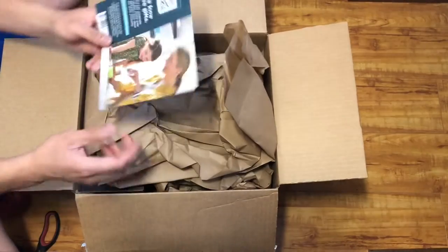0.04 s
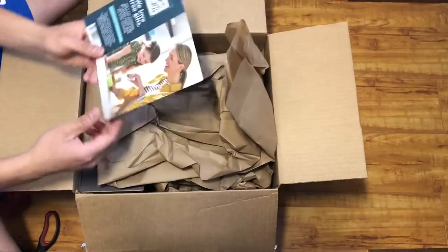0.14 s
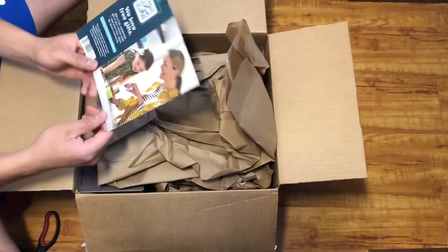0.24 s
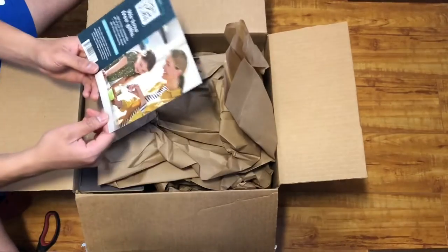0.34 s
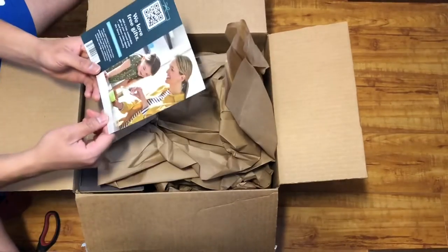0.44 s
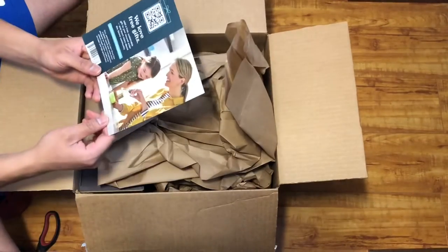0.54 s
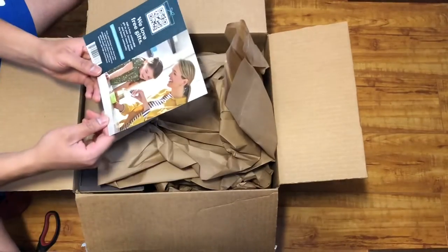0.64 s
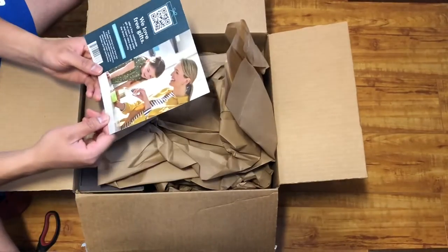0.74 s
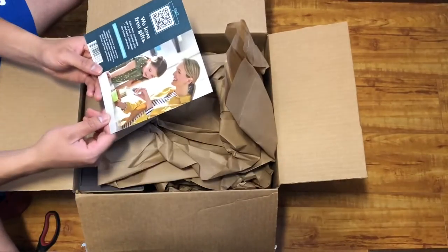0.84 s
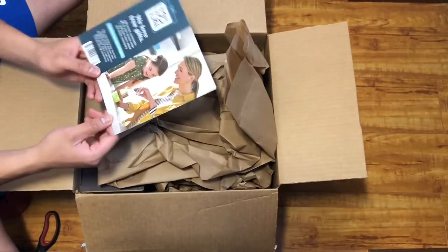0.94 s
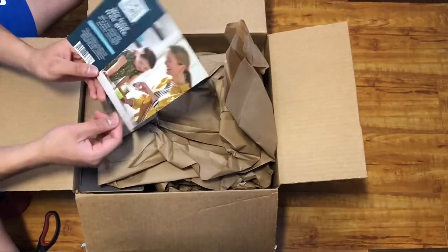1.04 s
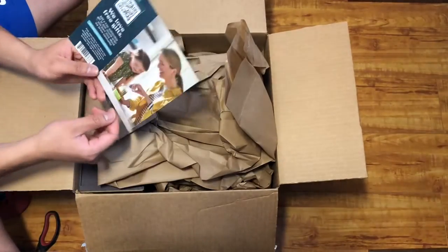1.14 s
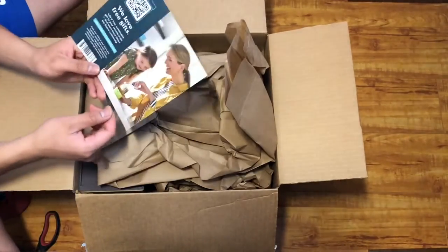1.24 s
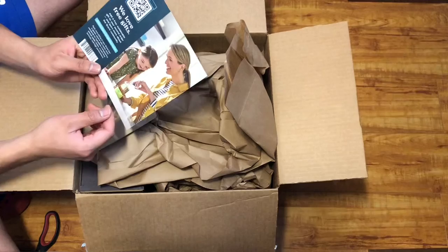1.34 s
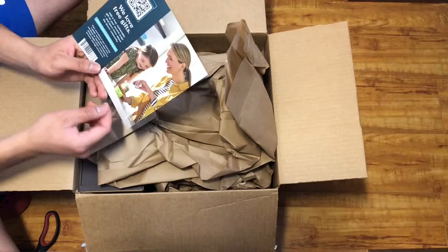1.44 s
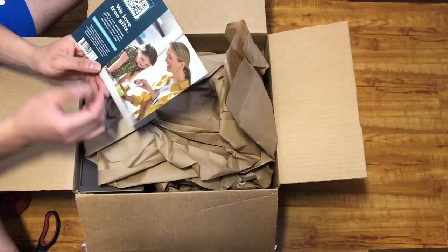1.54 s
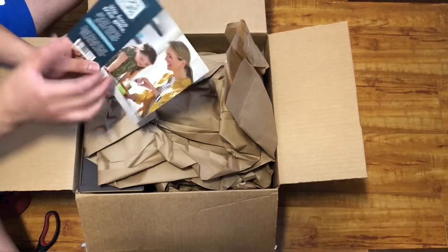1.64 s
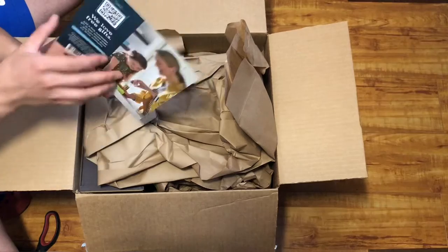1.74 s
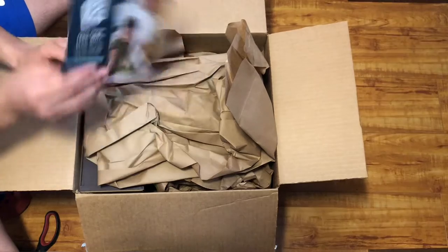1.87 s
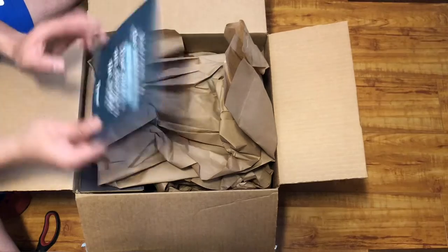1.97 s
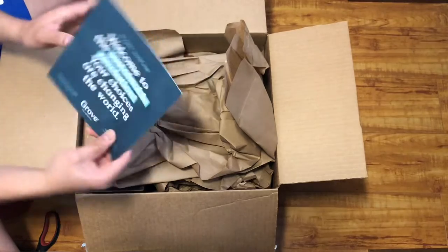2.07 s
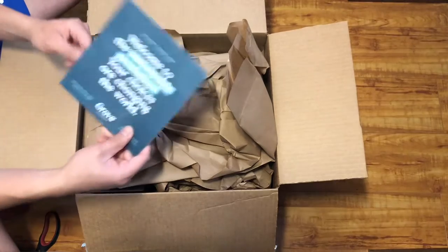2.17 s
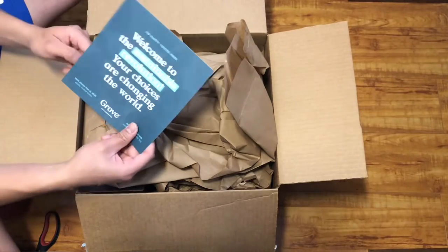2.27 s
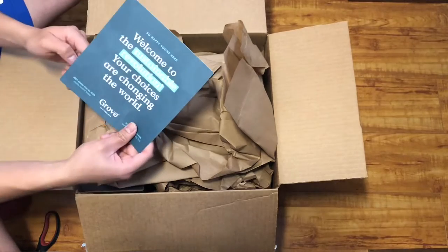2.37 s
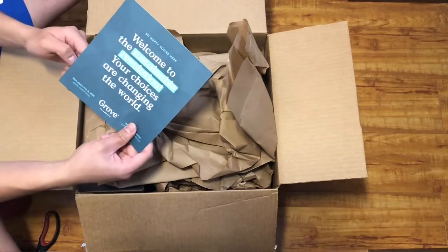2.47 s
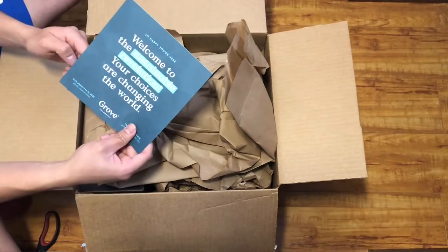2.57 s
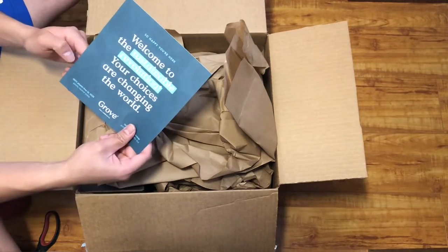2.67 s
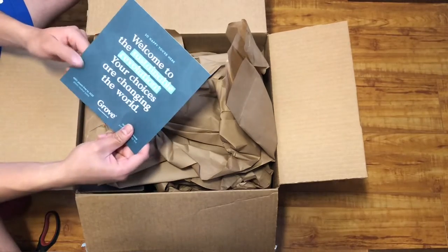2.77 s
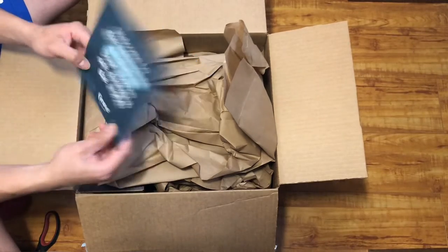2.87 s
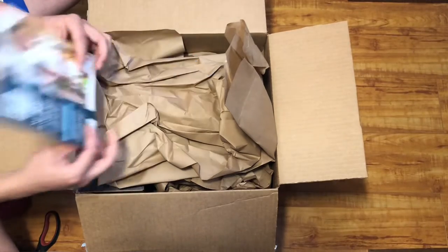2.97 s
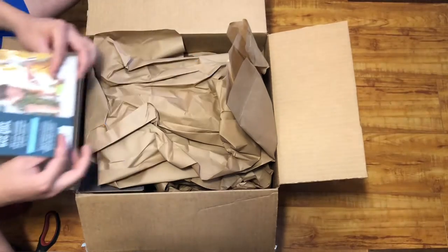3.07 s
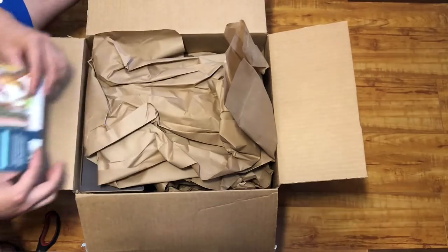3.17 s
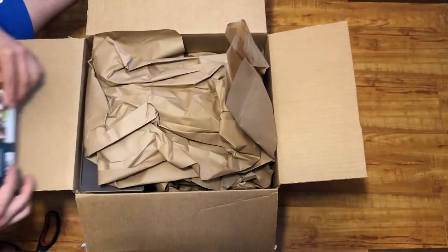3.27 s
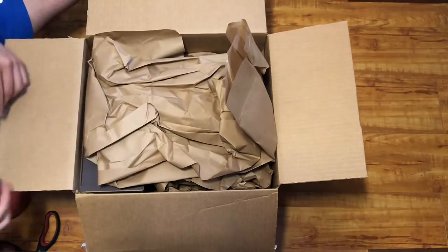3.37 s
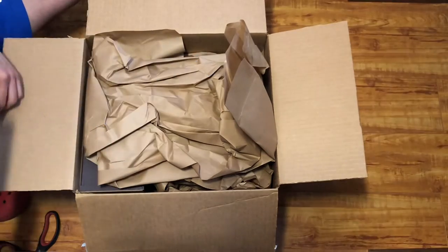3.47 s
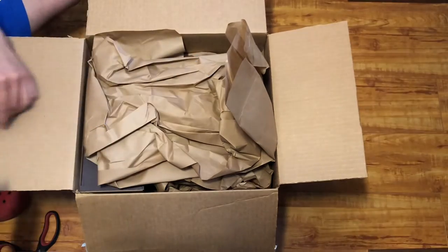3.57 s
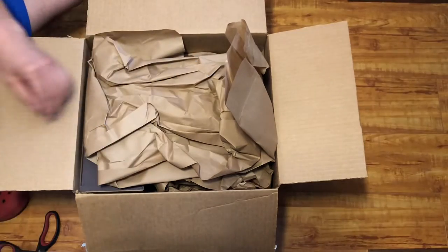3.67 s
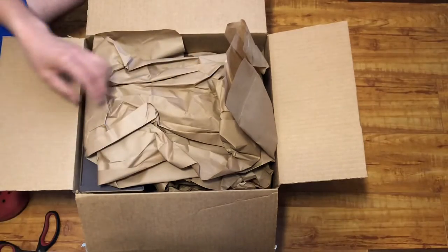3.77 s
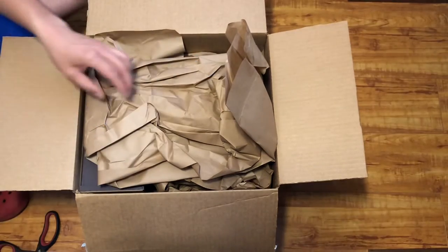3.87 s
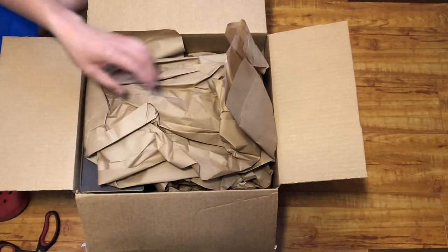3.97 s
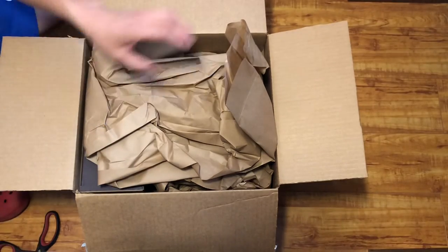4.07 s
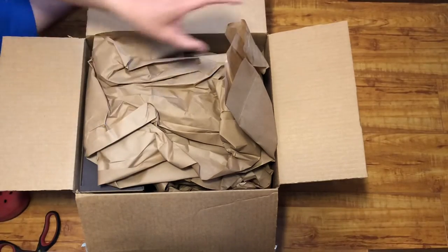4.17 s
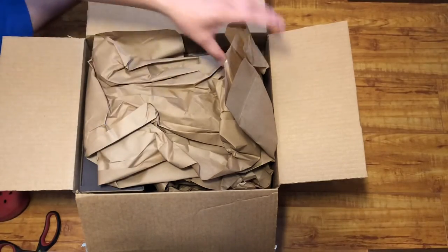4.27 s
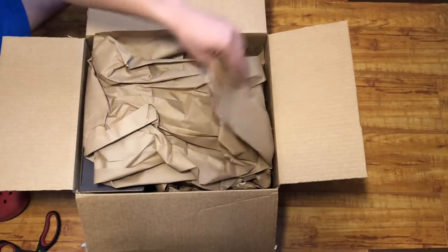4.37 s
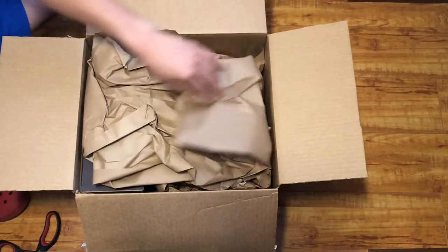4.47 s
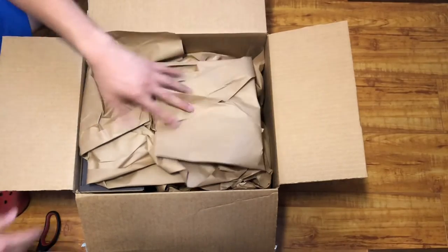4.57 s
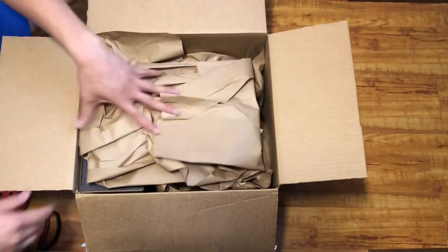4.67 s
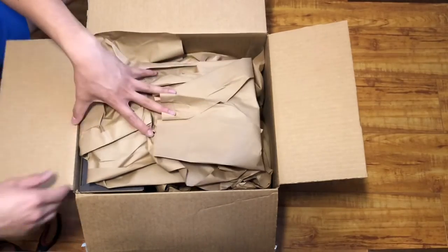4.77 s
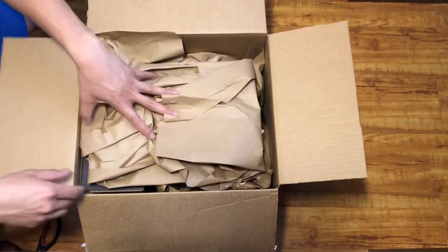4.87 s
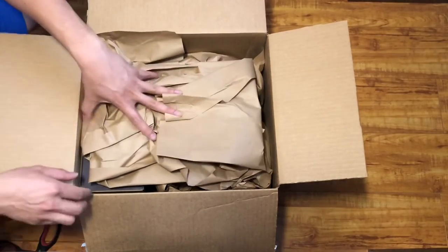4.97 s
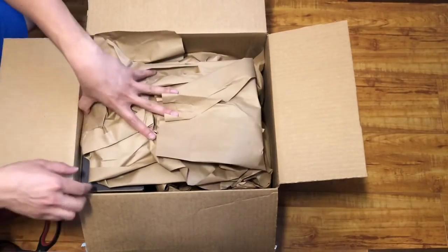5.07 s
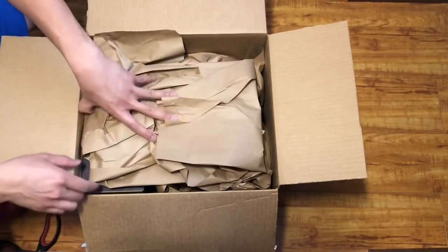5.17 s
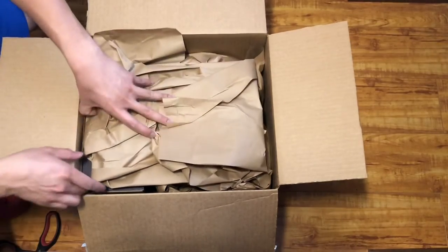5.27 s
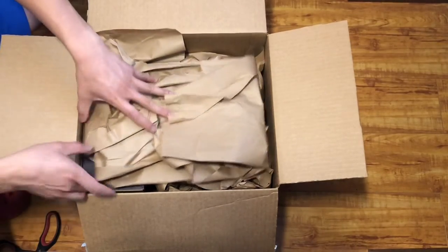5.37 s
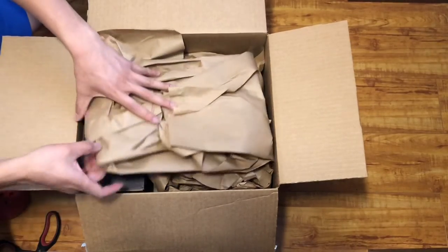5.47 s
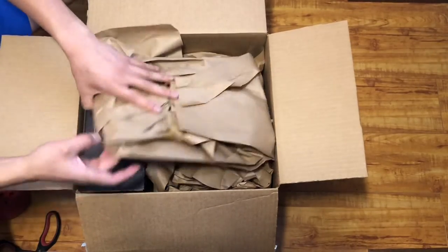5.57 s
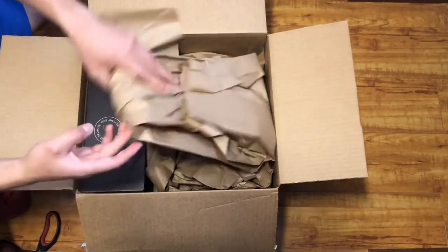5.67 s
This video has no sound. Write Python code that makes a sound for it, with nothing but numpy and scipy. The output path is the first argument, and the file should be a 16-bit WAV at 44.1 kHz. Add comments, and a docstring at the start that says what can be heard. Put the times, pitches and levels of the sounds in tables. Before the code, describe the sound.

In a quiet small room, close up, fingers brush a glossy card, pause, then flip it with light snaps. It drops on a cardboard flap with a dull knock. After a near-silent gap, stiff brown paper is grabbed and pressed in a box, crackling loudly to the end.

```python
"""A quiet room, a box close by: fingers slide over and flick a glossy card and drop it on a cardboard flap,
then press and pull kraft paper in the box. Clumps of tiny noise bursts make the slides and crackles;
bright noise bursts through a resonance are the buckling creases; sheet and box modes ring dully below.
The room adds a short diffuse tail and a hiss of shaped noise; two far sine tones hum for a moment."""
import sys
import numpy as np
from scipy import signal
from scipy.fft import rfft, irfft, next_fast_len
from scipy.io import wavfile

SR = 44100
rng = np.random.default_rng(int(sys.argv[2]) if len(sys.argv) > 2 else 0)


def store_pcm(level_fs):
    """Save levels as 16-bit WAV."""
    pcm = np.round(np.clip(level_fs, -1, 1) * 32767).astype(np.int16)
    wavfile.write(sys.argv[1], SR, np.atleast_2d(pcm).T)


N = 252252
PAPER_FROM_S = 4.0   # glossy card before this time, kraft paper after it


def amp(db):
    """Amplitude factor of a level in dB."""
    return 10 ** (np.asarray(db) / 20)


def rms_one(x):
    """Scales a signal to an rms of 1."""
    return x / np.sqrt(np.mean(x ** 2) + 1e-20)


def in_time(rows):
    """Draws each column as a line through its times, sample by sample."""
    s, *columns = np.transpose(rows)
    return [np.interp(np.arange(N) / SR, s, column) for column in columns]


def coloured(x, points):
    """Weighs the spectrum by (frequency [Hz], level [dB]) points, joined over log frequency."""
    hz, level_db = np.transpose(points)
    size = next_fast_len(N)
    grid = np.maximum(np.arange(size // 2 + 1) * SR / size, 1)
    weight_db = np.interp(np.log(grid), np.log(hz), level_db)
    return irfft(rfft(x, size) * amp(weight_db), size)[:N]


def drift(rate_hz):
    """Slow chance of spread 1: noise through two equal low-pass poles, after a second to settle."""
    r = np.exp(-2 * np.pi * rate_hz / SR)
    slow = signal.lfilter([1], [1, -2 * r, r * r], rng.standard_normal(N + SR))
    return rms_one(slow[SR:])


def resonance(x, hz, width_hz):
    """A two-pole resonance with zeros at both ends of the spectrum."""
    r = np.exp(-np.pi * width_hz / SR)
    zeros = [(1 - r * r) / 2, 0, (r * r - 1) / 2]
    poles = [1, -2 * r * np.cos(2 * np.pi * hz / SR), r * r]
    return signal.lfilter(zeros, poles, x + 1e-18)


def grains(per_s, spread_db, clump_db, clump_rate, burst_s):
    """Random micro-buckles of uneven size, in clumps; each is a very short burst of noise."""
    born = rng.random(N) < per_s * amp(clump_db * drift(clump_rate)) / SR
    sizes = amp(spread_db * np.minimum(rng.exponential(1, N), 4)) * born
    r = np.exp(-1 / (burst_s * SR))
    power = signal.lfilter([1], [1, -r * r], sizes ** 2)   # overlapping bursts add in power
    return rms_one(np.sqrt(power + 1e-12) * rng.standard_normal(N))


def facets(sharpness, **grain):
    """Small and large facets of the paper buckle apart, each size ringing at its own pitch."""
    pitches_hz = np.geomspace(2200, 14500, num=7)
    return sum(np.sqrt(hz) * rms_one(resonance(grains(**grain), hz, hz / sharpness)) for hz in pitches_hz)


# resonances of the bent sheet: (frequency [Hz], width [Hz], level [dB])
SHEET_MODES = [(713, 790, -2), (1156, 344, 6.5), (1558, 280, 4.5), (2070, 2240, -10)]


def sheet(x, sway_db=0):
    """The sheet's resonances; their balance sways as it is bent into new shapes."""
    out = 0
    for k, (hz, width_hz, level_db) in enumerate(SHEET_MODES):
        sway = sway_db * drift(10.2) if sway_db else 0
        out = out + (-1) ** k * amp(level_db + sway) * resonance(x, hz, width_hz)
    return out


# strokes of the hands, each a rise, a hold and a fade:
# (time [s], hold [s], crackle level [dB], sheet boom over crackle [dB], extra treble over crackle [dB])
HAND_STROKES = [(0.0, 0.02, -54.5, -9, 1), (0.193, 0.052, -57, -3, 2), (0.822, 0.011, -72, 7, -2),
                (0.972, 0.046, -59, -1.5, -3), (1.1, 0.013, -67, 1, -7), (1.753, 0.022, -59, -2, -5),
                (1.808, 0.013, -40.5, -14, 1.5), (1.925, 0.034, -45.5, -12, 5.5),
                (2.017, 0.019, -58, -8, 2), (2.107, 0.072, -52.5, -4.5, 6.5), (2.271, 0.057, -65, 4.5, -8),
                (2.788, 0.053, -54.5, -4.5, 5.5), (2.855, 0.023, -44, -12.5, 0.5),
                (2.953, 0.066, -54, -2, -1), (3.128, 0.035, -56.5, -7, 8), (3.185, 0.088, -55, 3, 11),
                (3.333, 0.0071, -55, 4, 9), (3.418, 0.019, -56.5, -1, 12.5), (3.521, 0.005, -64, 9.5, 8.5),
                (4.085, 0.068, -54.5, 7, 3), (4.193, 0.012, -63.5, 15, 7.5), (4.283, 0.025, -41, -4.5, 5.5),
                (4.304, 0.045, -33.5, -1, 3), (4.355, 0.0095, -28.5, -16, 2),
                (4.437, 0.15, -34.5, -3.5, 1.5), (4.631, 0.045, -40, -1.5, 4.5),
                (4.756, 0.11, -53.5, 0.5, 7.5), (4.847, 0.053, -43, 4, 3.5), (4.935, 0.037, -36, -2.5, 3),
                (5.044, 0.054, -48, -3.5, 5), (5.12, 0.083, -41, 1.5, 1.5), (5.191, 0.023, -40, 0, -2),
                (5.26, 0.02, -43.5, 4.5, -3), (5.308, 0.067, -43, 2, 1), (5.365, 0.057, -36.5, 0, 6),
                (5.438, 0.0097, -31.5, -2, -8), (5.505, 0.012, -39, 6, 8), (5.538, 0.2, -31.5, 0, 1.5),
                (5.703, .03, -29, -3, 1)]
RISE_DB_PER_S, FADE_DB_PER_S = 500, 268
GRAB_DB_PER_S = 1200   # rise on paper: stiff paper answers a grab at once


def strokes():
    """Gains of crackle, treble and boom: overlapping strokes add in power."""
    s, hold, level_db, boom_db, treble_db = np.transpose(HAND_STROKES)[:, :, None]
    t = np.arange(0, N + 64, 64) / SR
    rise_rate = np.where(s > PAPER_FROM_S, GRAB_DB_PER_S, RISE_DB_PER_S)
    rise_db = rise_rate * np.maximum(s - t, 0)
    fade_db = FADE_DB_PER_S * np.maximum(t - s - hold, 0)
    shape_db = level_db - rise_db - fade_db
    gains = []
    for extra_db in (0, treble_db, boom_db):
        gain = np.sqrt(np.sum(amp(shape_db + extra_db) ** 2, axis=0))
        gains.append(np.interp(np.arange(N) / SR, t, gain))
    return gains


# colour of crackling kraft paper: (frequency [Hz], relative density [dB per Hz])
KRAFT_COLOUR = [(1060, 6), (1800, -4), (2010, 3.5), (2810, 7), (3490, 11), (5310, 8), (8360, 3),
                (10500, -3), (15800, -2)]
# colour of skin on glossy card: (frequency [Hz], relative density [dB per Hz])
SLIDE_COLOUR = [(1500, -23), (2540, -4), (3860, 3.5), (6660, -4), (15100, -15), (15800, -4)]


def rustle():
    """Skin sliding on card is dense and smooth, kraft paper grainy; both shake the sheet."""
    crackle_gain, treble_gain, boom_gain = strokes()
    on_paper = np.arange(N) / SR > PAPER_FROM_S
    slide = grains(per_s=2700, spread_db=4.0, clump_db=3.5, clump_rate=33, burst_s=0.0041)
    whole = grains(per_s=800, spread_db=4.0, clump_db=2.0, clump_rate=29, burst_s=0.0034)
    apart = facets(sharpness=4.3, per_s=230, spread_db=4.5, clump_db=3, clump_rate=20, burst_s=0.0066)
    kraft = whole + amp(-4.5) * rms_one(apart)

    kraft_bright = rms_one(coloured(kraft, KRAFT_COLOUR))
    slide_bright = rms_one(coloured(slide, SLIDE_COLOUR))
    bright = np.where(on_paper, kraft_bright, slide_bright)
    top = signal.sosfilt(signal.butter(2, 7000, "high", fs=SR, output="sos"), bright)

    flex = grains(per_s=700, spread_db=2.0, clump_db=1.5, clump_rate=23, burst_s=0.0041)
    shake = flex + amp(-5.5) * np.where(on_paper, whole, slide)
    boom = rms_one(sheet(shake, sway_db=3.0))
    return crackle_gain * (bright - top) + treble_gain * top + boom_gain * boom


# buckling creases and flicks:
# (time [s], crack peak level [dB], facet pitch [Hz], sheet boom peak over crack peak [dB])
CREASE_SNAPS = [(0.1781, -51.5, 3700, 7.5), (0.1974, -53, 3250, 12), (0.253, -50.5, 3200, 6.5),
                (0.8294, -56, 3200, 1), (1.0117, -41.5, 3700, -0.5), (1.1108, -54, 4700, 2),
                (1.706, -53, 3200, 2), (1.752, -47.5, 3200, 3.5), (1.812, -32, 4200, 2.5),
                (1.8241, -31.5, 3980, 6), (1.8496, -42, 4200, 4), (1.9574, -26.5, 4960, -11.5),
                (2.1407, -32.5, 3040, 5), (2.167, -29, 6300, -1), (2.3225, -53, 3700, 10.5),
                (2.482, -51, 3800, -5), (2.785, -47, 4000, 3), (2.8776, -39, 3600, -5),
                (2.9058, -42, 3500, 1.5), (3.059, -33.5, 4430, -8.5), (3.081, -42, 6000, -4),
                (3.327, -32, 8200, 0), (3.407, -42, 3100, -3), (3.505, -50.5, 2500, 9),
                (4.0826, -45.5, 2500, 13.5), (4.1925, -36, 2700, -1), (4.2097, -43.5, 2700, 8.5),
                (4.307, -7.5, 5050, -28), (4.3193, -14.5, 5550, -7), (4.361, -12, 5260, -23),
                (4.371, -10.5, 4400, -16), (4.3973, -22.5, 4000, -7), (4.4196, -4, 6700, -21.5),
                (4.4393, -14, 5500, -12.5), (4.4895, -23, 2980, -10), (4.5443, -10.5, 5660, -5),
                (4.562, -14, 4000, -8), (4.5776, -21.5, 4000, -7), (4.6352, -18, 6800, -19),
                (4.6414, -19.5, 3700, -11), (4.6522, -21, 4500, -4.5), (4.8711, -28.5, 3000, 4),
                (4.8823, -30, 3000, 7.5), (4.921, -19.5, 8000, -6), (4.9337, -21, 4500, 0.5),
                (4.9712, -20, 4230, -2.5), (4.983, -14.5, 4450, -12), (5.07, -25, 4860, -16),
                (5.095, -24.5, 4100, -6), (5.1311, -28.5, 3400, 8), (5.1888, -19, 7000, -4.5),
                (5.2752, -28.5, 4000, 1.5), (5.302, -28, 3500, 9.5), (5.3174, -20, 5800, 0),
                (5.3278, -26.5, 5500, -8), (5.3924, -11.5, 12500, -19), (5.44, -21, 5500, -12),
                (5.45, -10.5, 6900, -11), (5.4609, -14, 6900, -9), (5.5162, -3.5, 9600, -17),
                (5.5413, -15, 4500, -6), (5.5547, -20, 3500, 0), (5.5928, -17.5, 6300, 2),
                (5.6367, -22, 4600, 1), (5.6626, -21, 5840, -4), (5.683, -12.5, 6000, -9),
                (5.7058, -10.5, 5600, -8)]


def snaps(crack_s=0.00083, boom_s=0.0034, tail_s=0.013, tail_db=-20, flat_db=-12, width=0.46):
    """A crease gives way in about a millisecond, rings at its facet's pitch, frays on and booms the sheet."""
    t = np.arange(round(.05 * SR)) / SR
    noise = rng.standard_normal((len(CREASE_SNAPS), 2, len(t)))
    out = np.zeros(N + len(t))
    broad = signal.butter(1, [1900, 15500], "band", fs=SR, output="sos")
    attack = np.minimum(t / 0.00026, 1)
    envelope = attack * (np.exp(-t / crack_s) + amp(tail_db) * np.exp(-t / tail_s))
    for (s, peak_db, hz, boom_db), (crack, shake) in zip(CREASE_SNAPS, noise):
        burst = crack * envelope
        # width is the share of the facet's pitch
        burst = resonance(burst, hz, width * hz) + amp(flat_db) * signal.sosfilt(broad, burst)
        burst = burst / np.abs(burst).max()
        boom = sheet(shake * np.exp(-t / boom_s))
        boom = boom / np.abs(boom).max()
        i = round(s * SR)
        out[i:i + len(t)] += amp(peak_db) * (burst + amp(boom_db) * boom)
    return out[:N]


# knocks on cardboard: (time [s], peak level before the contact softens it [dB],
# pitch most excited [Hz], share of the free ring time that the hands allow [ratio])
CARDBOARD_KNOCKS = [(0.066, -35.5, 725, 0.32), (0.0805, -38, 650, 0.3), (0.1013, -42, 607, 0.26),
                    (0.196, -42.5, 754, 0.33), (1.029, -52, 133.4, 0.33), (1.304, -51.5, 649, 0.41),
                    (1.982, -39.5, 251, 0.25), (2.139, -30.5, 899, 0.49), (2.165, -32, 571, 0.25),
                    (2.188, -33.5, 284, 0.25), (2.796, -43, 400, 0.19), (3.034, -38, 477, 0.28),
                    (3.212, -39, 228, 0.23), (3.328, -19, 248, 0.72), (3.408, -25.5, 304, 0.35),
                    (3.505, -36.5, 313, 0.2), (4.085, -32, 493, 0.65), (4.123, -28.5, 493, 0.34),
                    (4.145, -29, 560, 0.26), (4.194, -30, 530, 0.68)]
# cardboard modes: (frequency [Hz], level [dB], free time to fade by 60 dB [s])
BOX_MODES = [(112, 1.5, 0.31), (157, -2, 0.24), (185, 0, 0.52), (257, 3, 0.17), (326.6, -6.5, 0.7),
             (377, -3, 0.4), (463, -6, 0.56), (530, -2, 0.25), (630, -0.5, 0.21), (787, 8.5, 0.082)]


def knocks(contact_s=0.0012, uneven_db=3.0, off_db_per_octave=12):
    """Each soft knock strikes the cardboard modes near its pitch hardest."""
    hz, level_db, t60 = np.transpose(BOX_MODES)[:, :, None]
    t = np.arange(SR // 2) / SR
    chance = rng.standard_normal((len(CARDBOARD_KNOCKS), 2, len(BOX_MODES), 1))
    out = np.zeros(N + len(t))
    for (s, peak_db, knock_hz, free), (uneven, facing) in zip(CARDBOARD_KNOCKS, chance):
        off_db = off_db_per_octave * np.abs(np.log2(hz / knock_hz))
        fade_db = 60 * t / (t60 * free)
        mode_db = level_db - off_db + uneven_db * uneven - fade_db
        modes = np.sign(facing) * amp(mode_db) * np.sin(2 * np.pi * hz * t)
        ring = modes.sum(axis=0)
        i = round(s * SR)
        out[i:i + len(t)] += amp(peak_db) * ring / np.abs(ring).max()
    contact = np.hanning(round(contact_s * SR))   # a soft touch spreads the blow
    return signal.lfilter(contact / contact.sum(), [1], out[:N])


# soft rumble of the box walls, one list a movement: (time [s], level [dB])
WALL_RUMBLE = [
    [(0.0, -70), (0.258, -64), (0.35, -84)],
    [(1.7, -61), (2.758, -75.5), (3.416, -54.5), (3.65, -74)],
    [(4.24, -70), (4.3, -53), (5.72, -52)],
]


def rumble():
    """Slow, soft rubs on the cardboard walls while the hands move."""
    rubs = grains(per_s=300, spread_db=3, clump_db=8.5, clump_rate=15, burst_s=0.0091)
    dull = signal.sosfilt(signal.butter(2, [120, 520], "band", fs=SR, output="sos"), rubs)
    t = np.arange(N) / SR
    gain = np.zeros(N)
    for move in WALL_RUMBLE:
        moving = (t >= move[0][0]) * (t < move[-1][0])
        gain += amp(in_time(move)[0]) * moving
    return gain * rms_one(dull)


ROOM_T60_S, ROOM_DB, WALL_CUT_HZ = 0.19, -16, 1200


def room(x):
    """A diffuse tail that dies away, dulled by the walls."""
    t = np.arange(round(.5 * SR)) / SR
    tail = rng.standard_normal(len(t)) * amp(-60 * t / ROOM_T60_S) * (t > .003)
    tail = signal.sosfilt(signal.butter(1, WALL_CUT_HZ, fs=SR, output="sos"), tail)
    return signal.fftconvolve(x, tail / np.sqrt(np.sum(tail ** 2)))[:N]


# colour of the room's hiss: (frequency [Hz], relative density [dB per Hz])
AIR_COLOUR = [(25, -21), (42, -9.5), (70, -3.5), (194, -12), (572, -19), (710, -20.5), (1590, -28.5),
              (2660, -31), (15800, -41)]
AIR_DB, AIR_SWAY_DB = -66, 0.79


def air():
    """The hiss of the quiet room: shaped noise whose level sways slightly."""
    hiss = rms_one(coloured(rng.standard_normal(N), AIR_COLOUR))
    return amp(AIR_DB + AIR_SWAY_DB * drift(4.4)) * hiss


# far hum: (time [s], upper tone [Hz], upper level [dB], level of the tone at a quarter of its pitch [dB])
FAR_HUM = [(0.85, 351, -82, -97), (1.018, 348, -75, -64), (1.136, 353.2, -80.5, -77),
           (1.85, 363, -64, -67.5)]


def hum():
    """Two thin far tones, two octaves apart, dip a little in pitch and then creep upward."""
    hz, upper_db, lower_db = in_time(FAR_HUM)
    turn = 2 * np.pi * np.cumsum(hz) / SR
    t = np.arange(N) / SR
    heard = np.clip(np.minimum(t - FAR_HUM[0][0], FAR_HUM[-1][0] - t) / 0.034, 0, 1)
    tones = amp(upper_db) * np.sin(turn) + amp(lower_db) * np.sin(turn / 4)
    return np.sqrt(2) * heard * tones   # levels are rms


def scene():
    """Hands, card, paper and box close by; their room tail, the hiss and the far hum behind them."""
    near = rustle() + snaps() + knocks() + rumble()
    return (near + amp(ROOM_DB) * room(near) + air() + hum())[None]


def record(dry):
    """The microphone drops the deepest bass; the top is cut steeply."""
    dry = signal.sosfilt(signal.butter(2, 60, "high", fs=SR, output="sos"), dry)
    return signal.sosfilt(signal.cheby2(20, 60, 16200, fs=SR, output="sos"), dry)   # stopband from 16200 Hz


dry = scene()
out = record(dry)
store_pcm(out)
```